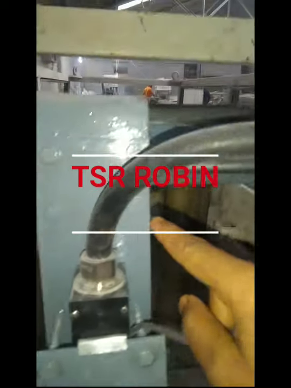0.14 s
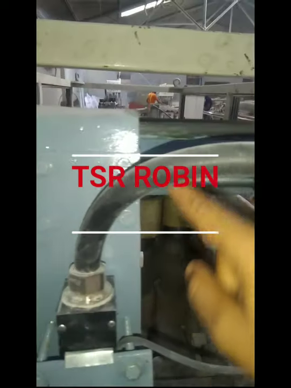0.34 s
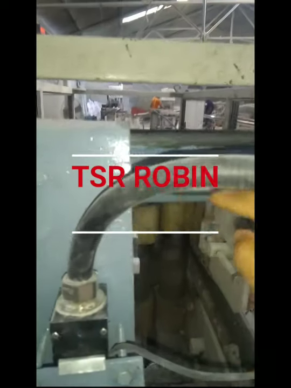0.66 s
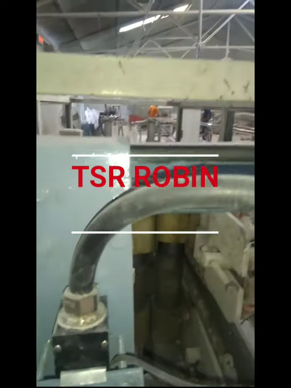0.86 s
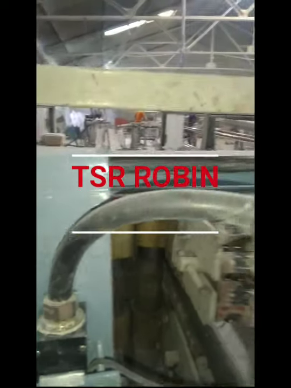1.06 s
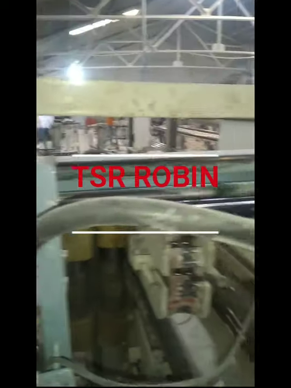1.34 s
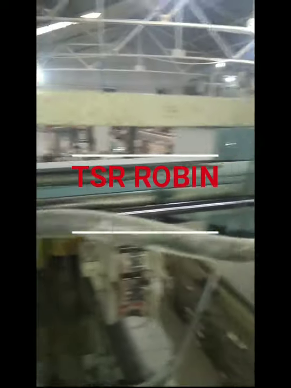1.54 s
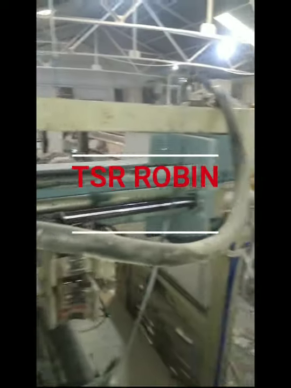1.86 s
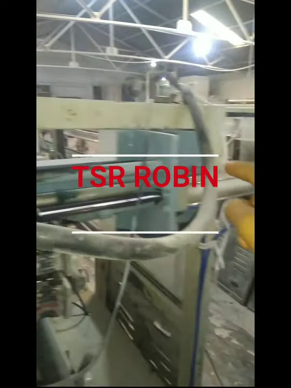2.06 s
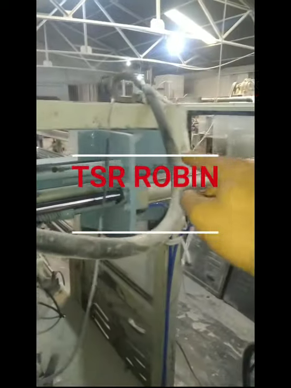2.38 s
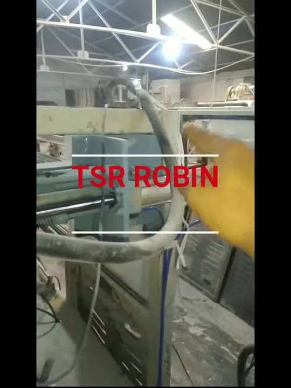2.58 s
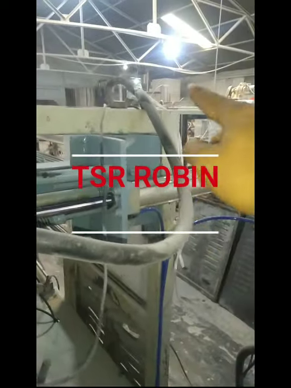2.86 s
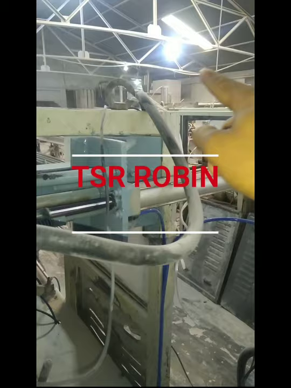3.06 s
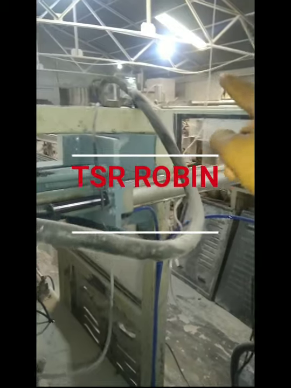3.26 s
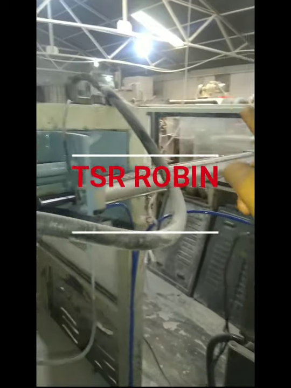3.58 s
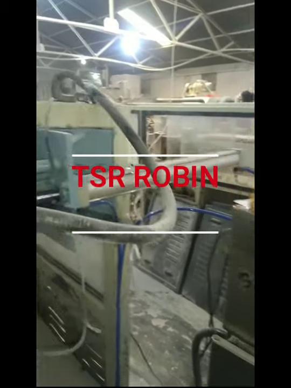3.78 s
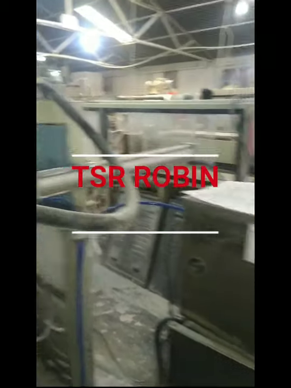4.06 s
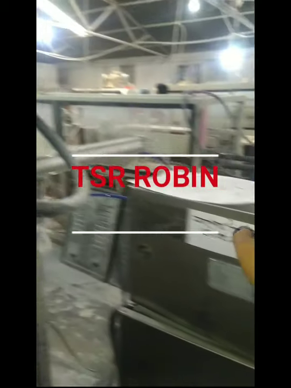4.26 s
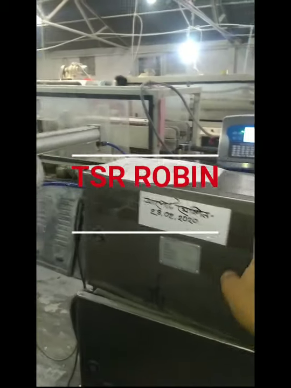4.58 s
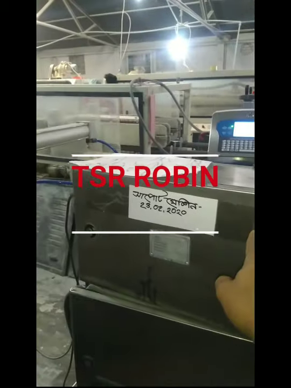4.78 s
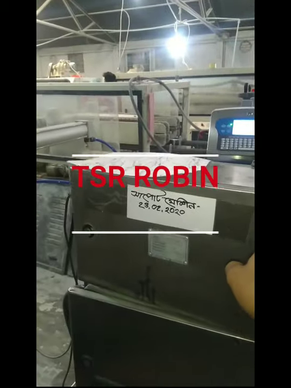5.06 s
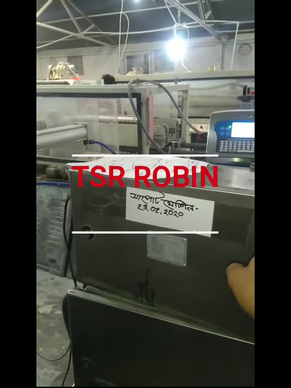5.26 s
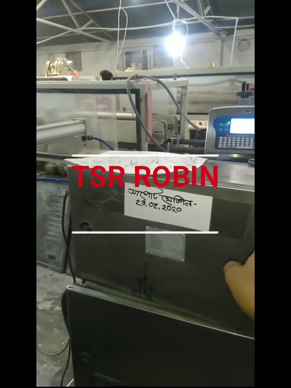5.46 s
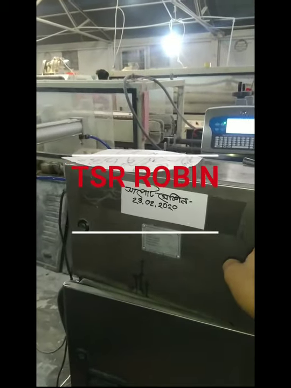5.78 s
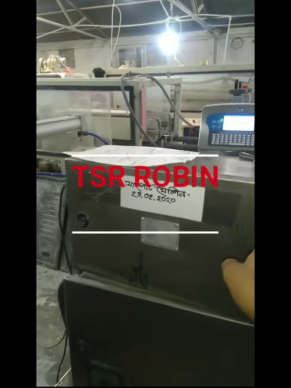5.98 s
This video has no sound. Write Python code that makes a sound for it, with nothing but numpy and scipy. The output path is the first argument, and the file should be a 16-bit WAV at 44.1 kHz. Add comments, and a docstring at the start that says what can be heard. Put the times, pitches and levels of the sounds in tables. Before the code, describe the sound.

Over a factory drone and motor whine, a shrill hissing whistle glides down and stops, leaving scattered chirps and a brief squeal.

```python
"""An air cylinder vents in a factory hall, with a hiss and whistles that fall as its pressure sinks.
Far machines drone throughout, and motors whine in flickering bands near 2 kHz for the first half.
Short hoots and two clatters of a machine frame come and go; near the end a rubbing part squeals.
The whistles echo in the hall, and a limiter turns down the loudest moments."""
import sys
import numpy as np
from scipy import signal
from scipy.fft import rfft, irfft, next_fast_len
from scipy.io import wavfile
from scipy.ndimage import uniform_filter1d, map_coordinates

SR = 44100
rng = np.random.default_rng(int(sys.argv[2]) if len(sys.argv) > 2 else 0)


def put_to_file(sound):
    """Save the sound as 16-bit audio at rate SR, in the file named by the first command-line argument."""
    columns = np.atleast_2d(sound).T  # one column per channel
    safe = np.clip(columns, -1, 1)
    whole_steps = np.round(safe * 32767)
    wavfile.write(sys.argv[1], SR, whole_steps.astype(np.int16))


N = 270333
TIME_S = np.arange(N) / SR


def amp(db):
    """Turn decibels into a gain to multiply by."""
    return 10 ** (np.asarray(db) / 20)


def unit_rms(x):
    """Scale a signal to an average strength (rms) of 1."""
    return x / np.sqrt(np.mean(np.abs(x) ** 2) + 1e-20)


def curve(rows):
    """Join (time_s, value) points with straight lines."""
    return np.interp(TIME_S, *np.transpose(rows))


def gate(rows):
    """1 during a table's time span and 0 outside it, with 10 ms fades."""
    start_s, end_s = rows[0][0], rows[-1][0]
    fade_in = (TIME_S - start_s) * 100 + (start_s == 0)
    fade_out = (end_s - TIME_S) * 100 + .5
    return np.clip(np.minimum(fade_in, fade_out), 0, 1)


def swell(start_s, end_s, level_db, rise_db_per_s, fall_db_per_s):
    """A level in dB that rises until the start, holds, and falls after the end."""
    before_s, after_s = np.maximum(start_s - TIME_S, 0), np.maximum(TIME_S - end_s, 0)
    return level_db - rise_db_per_s * before_s - fall_db_per_s * after_s


def wander(rate_hz, with_phase=False, size=N):
    """A smooth random wobble of strength 1, with rate_hz new values a second."""
    place = np.cumsum(np.clip(rate_hz, .1, 2500) * np.ones(size) / SR)
    draws = rng.standard_normal((2, 16000))
    wobble = map_coordinates(draws[0], [place], order=2)
    if with_phase:
        wobble = wobble + 1j * map_coordinates(draws[1], [place], order=2)
    return unit_rms(wobble)


def rough_tone(pitch_hz, width_hz, harmonics_db, steady=0.):
    """A tone and its overtones wavering together; more width is noisier, more steady is purer."""
    out = np.zeros(N)
    heard = np.flatnonzero(harmonics_db[0] + out > -75)
    span = slice(heard[0], heard[-1] + 1)
    pitch, width, *levels_db = [(v + out)[span] for v in (pitch_hz, width_hz, *harmonics_db)]
    waver = steady + wander(width, with_phase=True, size=len(width))
    wave = waver * np.exp(2j * np.pi * np.cumsum(pitch) / SR)
    for k, db in enumerate(levels_db, 1):
        harmonic = wave ** k / np.abs(wave) ** ((k - 1) / 2)
        out[span] += amp(db) * unit_rms(harmonic.real)
    return out


def air_whistle(pitch_hz, base_width_hz, level_db, octave_db):
    """Air sings in a narrow gap; faster air is rougher, and its swirls add a breathy edge."""
    width_hz = base_width_hz * (pitch_hz / 3500) ** 3
    tone = rough_tone(pitch_hz, width_hz, [level_db, level_db + octave_db], steady=.26)
    breath_db = [level_db - 19.5, level_db + octave_db - 8]
    return tone + rough_tone(pitch_hz + .96 * width_hz, 3.7 * width_hz, breath_db)


OPEN_DB_PER_S, CLOSE_DB_PER_S = 900, 193
# The main whistle, sinking with the pressure: time_s, pitch_hz
MAIN_PITCH = [(.19, 6554), (.35, 5993), (.6, 5474), (.9, 4797), (1.05, 4540), (1.2, 4166), (1.32, 3920),
              (1.55, 3705), (2.2, 3559), (2.95, 3451), (3.2, 3365)]
# The vent's whistles, each at pitch_ratio times the main pitch plus an offset:
# start_s, end_s, level_db, pitch_ratio, offset_hz, base_width_hz, octave_db
WHISTLES = [(.19, 3.12, -18.5, 1, 0, 87, -12.5), (.19, 1.1715, -22.5, 1.03, 1020, 73, -15.5),
            (1.25, 3.19, -21.5, 1.3, -915, 90, -16.5), (1.17, 1.415, -35, 0, 5279.5, 130, -32),
            (.21, 0.57, -34, 0.02, 5049, 160, -30)]
# A rasp between the first two whistles: start_s, end_s, level_db, rise_db_per_s, fall_db_per_s
RASP = (0.52, 1.26, -22.5, 41, 90)


def vent_whistles():
    """One whistle dies as the valve opens; new ones start, and the loudest sink with the pressure."""
    main_hz = curve(MAIN_PITCH)
    main_hz += .018 * (main_hz - 3000) * wander(22.01)   # the glide stumbles, more so when high
    early_hz = np.maximum(5280 - 830 * TIME_S, 2640)
    out = air_whistle(early_hz, 125, swell(0, .18, -17, 0, 330), octave_db=-29)
    # the overtone an octave up is weaker when the main pitch is very high or low
    loss_db = (4.5 * np.maximum(main_hz - 4400, 0) + 16 * np.maximum(3699 - main_hz, 0)) / 1000
    for start_s, end_s, db, ratio, offset_hz, width_hz, octave_db in WHISTLES:
        level_db = swell(start_s, end_s, db, OPEN_DB_PER_S, CLOSE_DB_PER_S)
        overtone_db = octave_db - loss_db + level_db - db   # it dies twice as fast
        out += air_whistle(ratio * main_hz + offset_hz, width_hz, level_db, overtone_db)
    gap_hz, rasp_db = WHISTLES[1][4], swell(*RASP)
    return out + rough_tone(main_hz + gap_hz / 2, 1.1 * gap_hz, [rasp_db, rasp_db - 27])


def vent_hiss():
    """Escaping air hisses, softer and duller as the pressure sinks, leaving a faint leak."""
    main_hz = curve(MAIN_PITCH)
    start_s, end_s = WHISTLES[0][:2]
    hiss_db = swell(start_s, end_s, -22, OPEN_DB_PER_S, CLOSE_DB_PER_S)
    hiss_db -= 10 * np.maximum(5450 - main_hz, 0) / 1000
    leak = amp(swell(0, 0, -26, 0, 150)) + amp(-46.5)   # a dying hiss at first, then steady
    bottom_hz, hiss_top_hz, leak_top_hz = 5260, 2.66 * main_hz, 14200
    out, white = 0, rng.standard_normal((2, N))
    for k, low_hz in enumerate(np.geomspace(bottom_hz, 14500, 12)):
        band_filter = signal.butter(2, [low_hz, low_hz * 1.1], "band", fs=SR, output="sos")
        band = signal.sosfilt(band_filter, white[k % 2])
        hiss_share, leak_share = [amp(-40 * np.maximum(np.log2(low_hz / top_hz) + .22, 0))
                                  for top_hz in (hiss_top_hz, leak_top_hz)]
        gain = np.hypot(amp(hiss_db) * hiss_share, leak * leak_share)
        tilt_db = -3 * np.log2(low_hz / bottom_hz)
        out += band * gain * amp(tilt_db + 1.5 * wander(15))
    return out


# How the motors' whine rises and falls: time_s, level_db
WHINE_LEVEL = [(0, -25), (.2, -24.5), (.28, -18), (.4, -26), (.58, -23), (.64, -35.5), (.7, -25),
               (.97, -32), (1.02, -19.5), (1.34, -29.5), (1.43, -20.5), (1.66, -29.5), (1.72, -20.5),
               (1.92, -26), (1.98, -18), (2.09, -21), (2.17, -35.5), (2.22, -20.5), (2.7, -25), (3.1, -30),
               (3.35, -29.5), (3.4, -43)]
# The pitch of its strongest tone: time_s, pitch_hz
WHINE_PITCH = [(0, 2120), (.4, 2032), (1, 2100), (2, 2075), (2.9, 2217), (3.4, 2180)]


def motor_whine():
    """Motors whine in five close tones that each flicker, fainter away from the centre pitch."""
    level_db, centre_hz = curve(WHINE_LEVEL), curve(WHINE_PITCH)
    out, spacing_hz, width_hz = 0, 95, 85
    for step in (-1, 0, 1, 2, 3):
        tone_db = level_db - 5.3 - 5.6 * abs(step) + 4.36 * wander(32)
        out += rough_tone(centre_hz + step * spacing_hz, width_hz, [tone_db])
    return gate(WHINE_LEVEL) * out


# The drone's balance from bass to treble: frequency_hz, relative_db
DRONE_COLOUR = [(20, -24), (30, -14), (75, 3.5), (143, -2), (376, -0.5), (626, -8.5), (818, -16.5),
                (1040, -9), (1500, -11.5), (2150, -5.5), (3050, -16), (4210, -12.5), (5360, -19),
                (8000, -35.5), (15200, -73)]
# How loud the drone's noise is: time_s, level_db
DRONE_LEVEL = [(0, -36), (.85, -40.5), (1.6, -34.5), (3.5, -33.5), (6.13, -33)]
# Faint machine hums: pitch_hz, width_hz, level_db
HUMS = [(375.6, 25, -53), (1075, 41, -56)]


def machine_drone():
    """Far machines blend into bands of gently swelling noise and two wavering hums."""
    hz, db = np.transpose(DRONE_COLOUR)
    size = next_fast_len(N)
    grid_hz = np.fft.rfftfreq(size, 1 / SR) + 1
    spectrum = rfft(rng.standard_normal(size)) * amp(np.interp(np.log(grid_hz), np.log(hz), db))
    noise, shared_db = 0, 1.23 * wander(4.206)
    for octave in np.arange(4, 14.5, .5):
        share = np.clip(1 - 2 * np.abs(np.log2(grid_hz) - octave), 0, 1)
        band = irfft(spectrum * share, size)[:N]
        depth = min(1, (14 - octave) / 2.7)   # the highest bands waver less
        noise += band * amp(depth * (1.48 * wander(12) + shared_db))
    hums = sum(rough_tone(hz, width, [db + 6.37 * wander(9.1)]) for hz, width, db in HUMS)
    return amp(curve(DRONE_LEVEL)) * unit_rms(noise) + hums


# Swarms of faint blips: start_s, end_s, lowest_hz, highest_hz, base_db, count
BLIPS = [(0.27, 3.2, 4900, 11000, -49.5, 230), (0, 6.1, 1400, 3200, -42.5, 95),
         (3.4, 6.1, 1900, 2600, -33, 45), (3.5, 6.1, 3500, 6400, -47.5, 43)]


def scatter_blips():
    """Draw random blips as rows for hoots(); the higher, the fainter."""
    rows = []
    for start_s, end_s, low_hz, high_hz, base_db, count in BLIPS:
        for when, height, strength, length in rng.random((round(count), 4)):
            onset_s = start_s + (end_s - start_s) * when
            level_db = base_db + 9 * strength - 10 * height
            pitch_hz = low_hz * (high_hz / low_hz) ** height
            rows.append((onset_s, level_db, pitch_hz, .013 + .036 * length))
    return rows


# The louder hoots and squeaks: start_s, level_db, pitch_hz, half_length_s
HOOTS = [(.2, -33, 4440, 0.18), (.548, -34.5, 1550, 0.086), (1.432, -29, 1491, .045),
         (1.539, -34, 1520, .1), (1.658, -33, 1480, .11), (1.765, -30, 1510, .075),
         (2.121, -34, 2740, .039), (2.219, -29, 224, .035), (2.4, -27, 590, .047),
         (2.472, -30.5, 565, 0.041), (2.791, -32, 1070, .044), (3.415, -22, 2130, .068),
         (3.438, -22, 583, 0.094), (3.453, -30, 1810, .036), (3.477, -31.5, 1454, 0.046),
         (3.5, -24.5, 2220, 0.073), (3.547, -33, 576, 0.097), (3.6, -17.5, 2087, 0.055),
         (3.72, -28, 1933, 0.12), (3.94, -23.5, 2197, 0.046), (3.97, -23, 2020, 0.047),
         (4.015, -25.5, 2175, 0.047), (4.143, -33.5, 1060, .018), (4.15, -33, 2100, .082),
         (4.21, -24, 2326, .044), (4.329, -31.5, 610, .06), (4.33, -36, 3880, .05),
         (4.465, -25, 1990, 0.027), (4.54, -27.5, 2340, 0.063), (4.7, -30.5, 4190, .062),
         (4.78, -25.5, 2343, 0.049), (4.865, -23, 2366, .018), (4.9, -25, 2070, 0.09),
         (4.923, -24, 2630, 0.035), (4.94, -25, 2450, 0.064), (5.06, -29, 636.5, 0.083),
         (5.06, -35, 3930, .049), (5.075, -30, 2660, 0.056), (5.08, -26.5, 2097, 0.064),
         (5.127, -31, 620, 0.07), (5.18, -23.5, 2096, 0.039), (5.25, -27, 2380, .1),
         (5.39, -25, 2243, .032), (5.435, -26, 2385, 0.036), (5.46, -38.5, 3900, 0.035),
         (5.582, -27, 1198, 0.019), (5.69, -22.5, 2150, 0.04), (5.749, -28.5, 1296, .036),
         (5.929, -29.5, 1183, 0.025), (5.93, -25.5, 2170, 0.082), (6.06, -30, 2156, .05),
         (6.09, -26, 2530, .03)]


def hoots(rows, waver_hz):
    """Short rough tones that swell fast and die away."""
    out = np.zeros(N)
    waver = .75 + .92 * wander(waver_hz, with_phase=True)
    for start_s, db, pitch_hz, half_length_s in rows:
        span = slice(round(start_s * SR), round((start_s + 2 * half_length_s) * SR))
        progress = np.abs(TIME_S[span] - start_s) / (2 * half_length_s)
        loudness = amp(db) * np.abs(np.sin(np.pi * progress ** .38)) ** 1.38
        own_waver = np.roll(waver, round(pitch_hz) * 7)[span]   # each tone wavers in its own way
        out[span] += loudness * (own_waver * np.exp(2j * np.pi * pitch_hz * TIME_S[span])).real
    return out


# Bursts of rattling: start_s, strength_db, time_scale_s, brightness_db
RATTLES = [(0.207, -40, 0.018, -3), (0.235, -35.5, 0.021, -1), (0.275, -35.5, 0.024, -1),
           (0.317, -38, 0.026, -3), (1.951, -41, 0.056, 8)]
# The machine frame's lower ringing notes: pitch_hz, width_hz, relative_db
FRAME_LOW = [(359, 83, 11.5), (557, 120, 6.5), (902, 100, 8.5), (1237, 130, 1), (1480, 130, 10.5),
             (1797, 220, 11.5), (2450, 200, 14)]
# Its high ringing notes: pitch_hz, width_hz, relative_db
FRAME_HIGH = [(5150, 650, 7), (11000, 2000, -6), (12800, 1500, -19)]


def frame_clatter():
    """Rattling makes a machine frame ring; each lower note answers with its own changing strength."""
    low_shake = high_shake = 1e-9
    for start_s, db, time_scale_s, brightness_db in RATTLES:
        age = np.maximum(TIME_S - start_s, 0) / time_scale_s
        shake = amp(db) * age * np.exp(-age ** 2)
        low_shake += shake
        high_shake += shake * amp(brightness_db)
    low_db, high_db = 20 * np.log10([low_shake, high_shake])
    body = sum(rough_tone(hz, width, [low_db + db + 4.3 * wander(29.09)]) for hz, width, db in FRAME_LOW)
    return body + sum(rough_tone(hz, width, [high_db + db]) for hz, width, db in FRAME_HIGH)


# The squeal's swell: start_s, end_s, level_db, rise_db_per_s, fall_db_per_s
SQUEAL_SWELL = (5.64, 6, -17, 110, 72)
# How its pitch bends: time_s, pitch_hz
SQUEAL_PITCH = [(5.5, 2462), (5.6, 2515), (5.8, 2553), (6.03, 2550), (6.13, 2480)]
# Its brief overtones: start_s, end_s, level_db, pitch_multiple
FLARES = [(5.78, 5.82, -35.5, 2), (5.96, 6.06, -33, 2), (5.65, 5.68, -52, 3), (5.87, 5.93, -44, 3),
          (5.98, 6.06, -51.5, 3)]


def rubbing_squeal():
    """A rubbing part squeals over a rough band of noise; now and then a thin overtone flares up."""
    pitch_hz, level_db = curve(SQUEAL_PITCH), swell(*SQUEAL_SWELL)
    out = rough_tone(pitch_hz, 140, [level_db], steady=.6)
    out += rough_tone(pitch_hz - 70, 330, [level_db - 7])
    for start_s, end_s, db, multiple in FLARES:
        flare_db = swell(start_s, end_s, db, 299.5, 299.5)
        out += rough_tone(multiple * pitch_hz, 91.2, [flare_db], steady=.7)
    return gate(SQUEAL_PITCH) * out


def hall_echo(sound):
    """The hall's echo dies away, sooner in the treble; falling whistles leave a smear above them."""
    split_hz, dull_s, bright_s = 6350, .35, .22   # times to fade by 60 dB
    t = np.arange(SR // 2) / SR
    white = rng.standard_normal(len(t))
    dull = signal.sosfilt(signal.butter(4, split_hz, fs=SR, output="sos"), white)
    bright = signal.sosfilt(signal.butter(4, split_hz, "high", fs=SR, output="sos"), white)
    tail = (dull * amp(-60 * t / dull_s) + bright * amp(-60 * t / bright_s)) * (t > .01)
    energy = np.sum(white ** 2 * amp(-120 * t / dull_s))
    return signal.oaconvolve(sound, tail / np.sqrt(energy))[:N]


def scene():
    """Add all the sounds into one channel; only the whistles get an echo."""
    whistles = vent_whistles()
    rows = HOOTS + scatter_blips()
    low_hoots = hoots([row for row in rows if row[2] < 800], waver_hz=115)   # pitch under 800 Hz
    high_hoots = hoots([row for row in rows if row[2] >= 800], waver_hz=200)
    other_sounds = motor_whine() + rubbing_squeal() + low_hoots + high_hoots
    other_sounds += frame_clatter() + machine_drone()
    return (whistles + amp(-4) * hall_echo(whistles) + vent_hiss() + other_sounds)[None]


def record(dry):
    """A limiter turns down the loudest moments, then a filter cuts the highest treble."""
    threshold_db, cut_share, release_db_per_s, cutoff_hz = -15, .66, 122, 15600
    window = round(.0048 * SR)
    level_db = 10 * np.log10(np.abs(uniform_filter1d(dry ** 2, window)) + 1e-12)
    over_db = np.maximum(level_db - threshold_db, 0)
    release_db = release_db_per_s * TIME_S
    held_db = np.maximum.accumulate(over_db + release_db, axis=1) - release_db   # lets go gradually
    limited = dry * amp(-cut_share * uniform_filter1d(held_db, window))
    return signal.sosfilt(signal.cheby2(14, 70, cutoff_hz, fs=SR, output="sos"), limited)


dry = scene()
out = record(dry)
put_to_file(out)
```